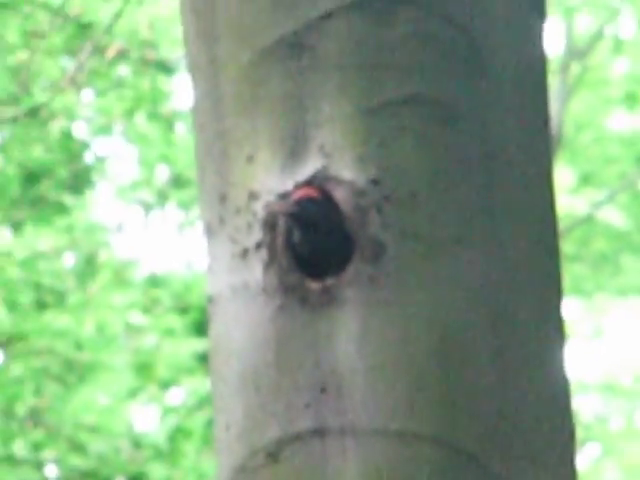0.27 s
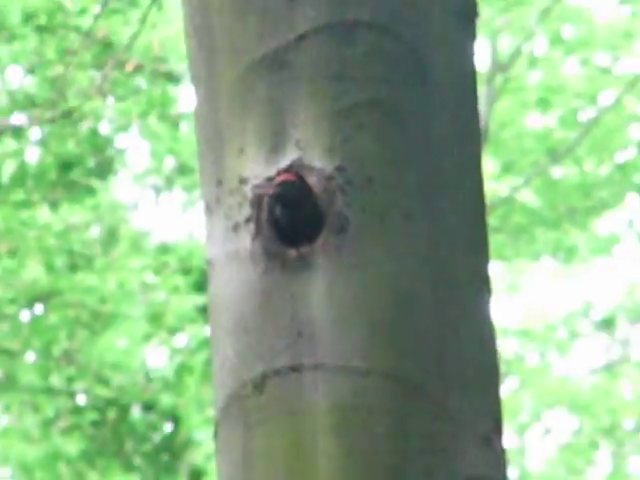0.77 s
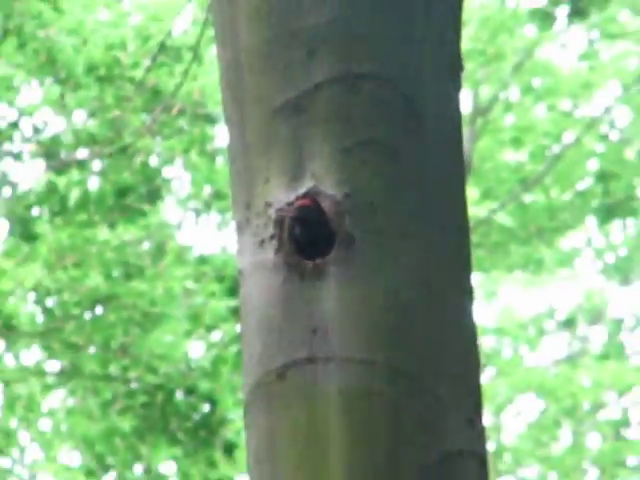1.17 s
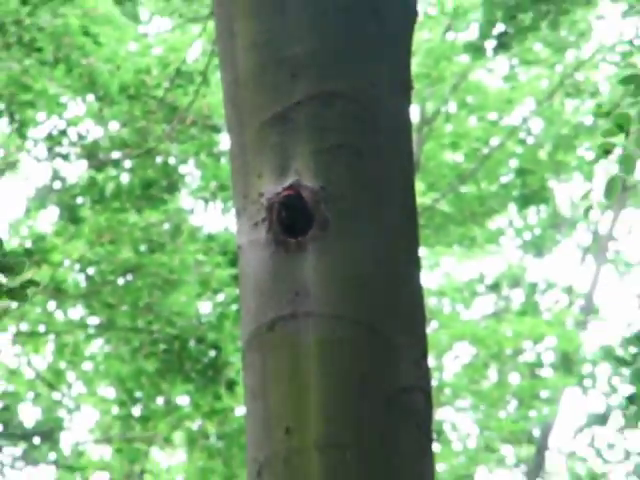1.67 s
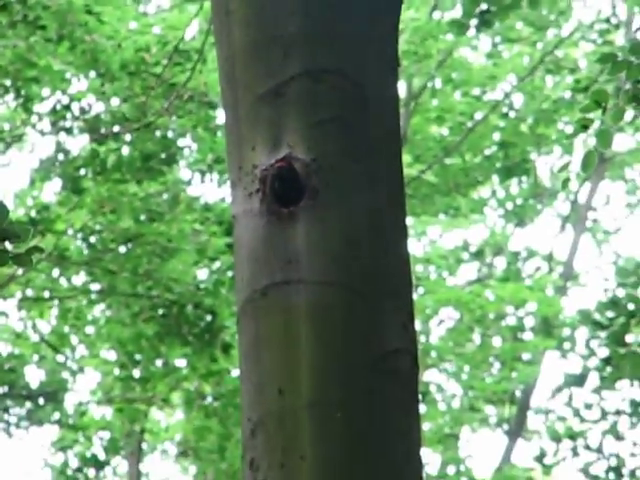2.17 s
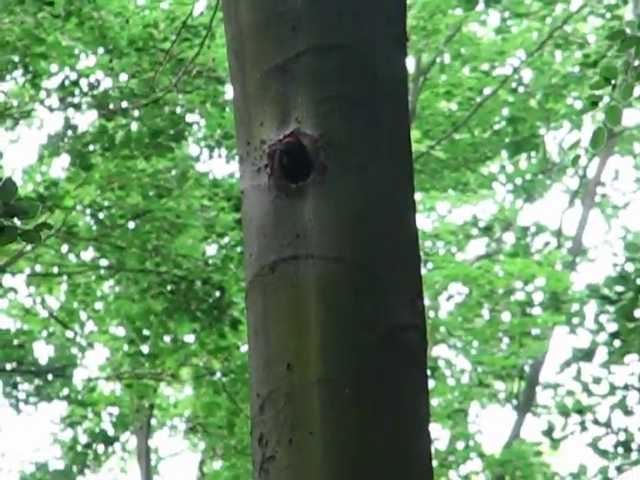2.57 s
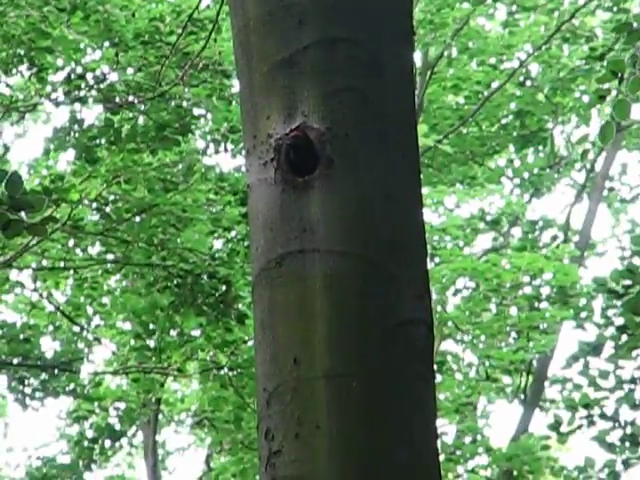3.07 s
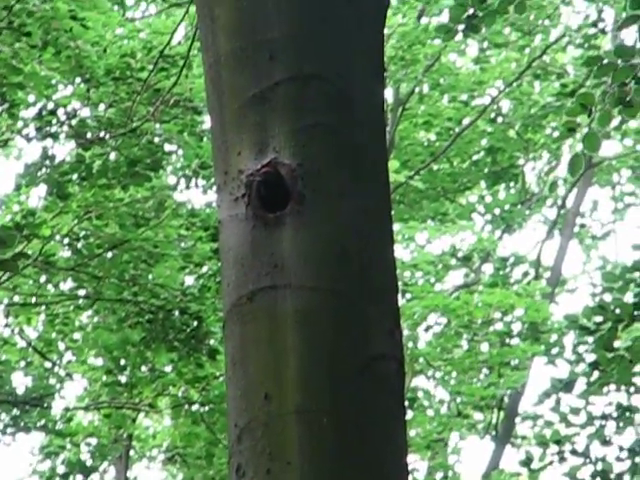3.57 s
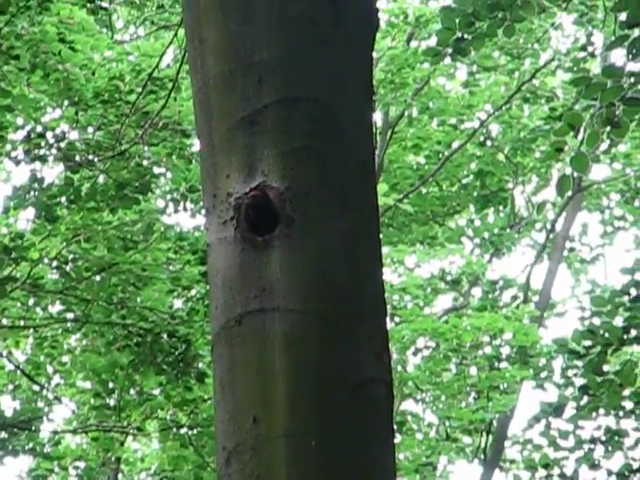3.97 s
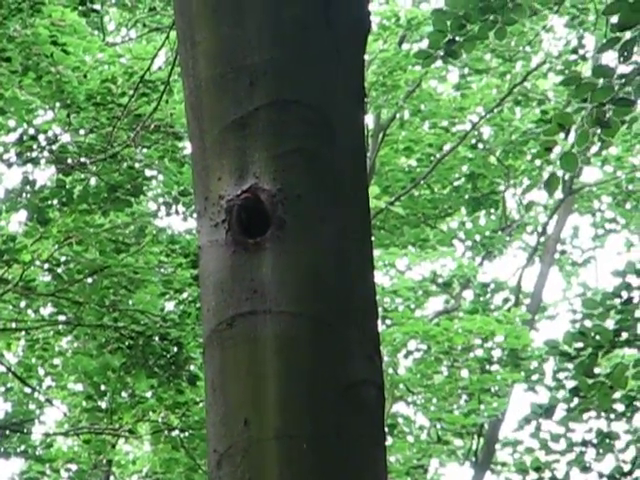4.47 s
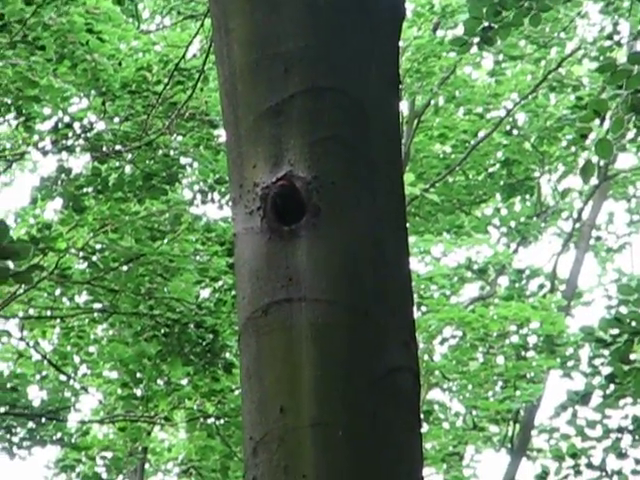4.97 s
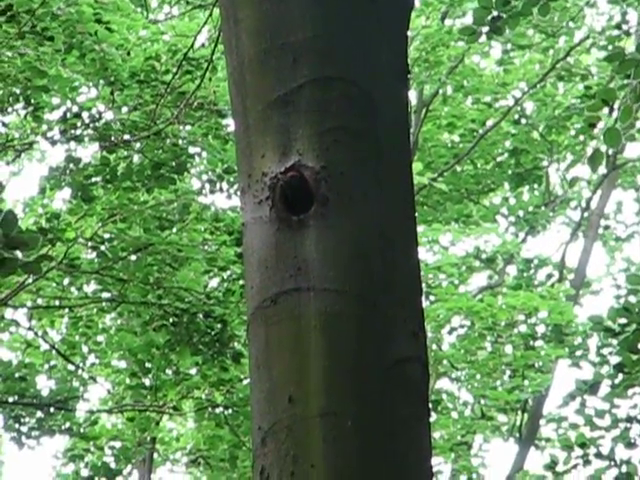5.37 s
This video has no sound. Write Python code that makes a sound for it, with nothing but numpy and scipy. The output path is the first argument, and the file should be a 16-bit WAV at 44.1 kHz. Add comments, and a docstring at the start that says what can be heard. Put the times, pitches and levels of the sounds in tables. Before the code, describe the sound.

Outdoor stereo in a quiet echoing wood: a young bird begs from its nest hole with short voiceless rasps, a long steady high squeal about a quarter of the way in, further rasps, and finally two rough double cries. Distant small birds whistle, trill and twitter faintly. Close by are an early dry click, a harder knock during the squeal, softer bumps and low uneven scuffing.

```python
"""Young woodpecker begging in the wood

High in a tree a nestling begs from its hole: breathy rasps of shaped noise, and one long thin squeal and
two harsh double cries from a pulsing membrane model. Scattered, decaying noise makes the wood's echoes.
Small birds whistle far off in gliding sines over a filtered-noise hush of leaves. One sharp dry click, a
single pulse, is heard early on; dull knocks of damped rings and a rustle of low, uneven noise are close by."""
import sys
import numpy as np
from scipy import signal
from scipy.fft import rfft, irfft
from scipy.io import wavfile
from scipy.ndimage import uniform_filter1d

SR = 44100
rng = np.random.default_rng(int(sys.argv[2]) if len(sys.argv) > 2 else 0)


def store_pcm(level_fs):
    """Save levels as 16-bit WAV."""
    pcm = np.round(np.clip(level_fs, -1, 1) * 32767).astype(np.int16)
    wavfile.write(sys.argv[1], SR, np.atleast_2d(pcm).T)


N = 247401
T = np.arange(N) / SR
FREQS = np.arange(N // 2 + 1) * SR / N

# Throat resonances of the squeal and its lead-in. Each row: frequency in Hz, gain in dB.
SQUEAL_COLOUR = [(1000, -50), (1550, -1.5), (2000, 4), (3100, 3.5), (4650, 1.5), (6200, -5.5), (7750, -1.5),
                 (9300, -9), (10900, -24.5), (14000, -55)]
# Throat resonances of the rasps, also the colour of the ticks. Each row: frequency in Hz, gain in dB.
RASP_COLOUR = [(900, -18.5), (1800, -13.5), (2600, -2), (3800, 0), (5000, -1.5), (6600, 6.5), (7800, 0),
               (9500, -12), (12500, -12.5), (15500, -28)]
# Colour of the air rushing in a voiced call. Each row: frequency in Hz, gain in dB.
AIR_COLOUR = [(600, -29.5), (1600, -13), (2300, -11), (3200, -0.5), (4400, -1.5), (5300, -5.5), (6600, 2),
              (8000, -11), (10000, -21), (13000, -21), (15500, -47)]
# The soft lead-in runs up to the squeal's start.
LEAD_IN_S, SQUEAL_START_S, SQUEAL_END_S = 1.394, 1.42, 2.09


def undb(db):
    """Decibels to gain."""
    return 10 ** (np.asarray(db) / 20)


def unit(x):
    """Scale to rms 1."""
    return x / np.sqrt(np.mean(x ** 2))


def at(points, hz):
    """Read (Hz, value) points on a log-frequency axis."""
    f, value = np.transpose(points)
    return np.interp(np.log(hz + 1), np.log(f), value)


def curve(rows):
    """The columns of (seconds, ..) rows, interpolated at every sample."""
    s, *columns = np.transpose(rows)
    return [np.interp(T, s, c) for c in columns]


def tint(x, colour):
    """Filter by (Hz, dB) points."""
    return irfft(rfft(x) * undb(at(colour, FREQS)), N)


def noise(colour):
    """Coloured noise of rms 1."""
    return unit(tint(rng.standard_normal(N), colour))


def walk(rate):
    """Smooth random motion of rms 1, about rate moves a second."""
    spectrum = rfft(rng.standard_normal(N)) * np.exp(-(FREQS / rate) ** 2)
    return unit(irfft(spectrum, N))


def envelope(start, length, attack_s, release_s):
    """Attack, hold and release; silent outside."""
    rise = (T - start) / attack_s
    fall = (start + length - T) / release_s
    return np.clip(np.minimum(rise, fall), 0, 1) ** 2


def pan(x, left_db):
    """Place a sound between left and right; left_db is left minus right."""
    return x * undb(np.array([[left_db], [-left_db]]) / 2)


def two_ears(x):
    """Sound from all around: two unrelated signals grow alike in the bass at closely spaced microphones."""
    # Left-right likeness of diffuse sound. Each row: frequency in Hz, correlation from 0 to 1.
    likeness_points = [(60, 1), (300, 0.65), (700, 0.53), (1500, 0.45), (3000, 0.14), (7000, 0.12)]
    freqs = np.fft.rfftfreq(x.shape[1], 1 / SR)
    likeness = np.clip(at(likeness_points, freqs), 0, 1)
    mid, side = irfft(rfft(x) * np.sqrt([1 + likeness, 1 - likeness]), x.shape[1])
    return unit(np.array([mid + side, mid - side]))


def wood(x, near_db, far_db, near_t60=0.46):
    """Echoes only: quick scatter from nearby trunks, and the long tail of the wood, shorter in the treble."""
    # Decay of the long tail. Each row: frequency in Hz, time to fall by 60 dB in seconds.
    tail_decay = [(400, 0.76), (1500, 1.4), (3200, 1.03), (6500, 1.14), (9000, 0.72), (14000, 0.48)]
    t = T[:int(1.5 * SR)]

    f, s, spray = signal.stft(rng.standard_normal((2, len(t))), SR, nperseg=256)
    t60 = np.maximum(at(tail_decay, f), .05)[:, None]
    tail = signal.istft(spray * np.exp(-np.log(1000) * s / t60), SR)[1][:, :len(t)]
    tail = tail * (1 - np.exp(-t / .028))  # the tail builds up gradually

    sparse = rng.standard_normal((2, len(t))) * (rng.random((2, len(t))) < .03)
    trunks = sparse * np.exp(-np.log(1000) * t / near_t60) * (t > .004)
    trunks = signal.sosfilt(signal.butter(2, 8000, fs=SR, output="sos"), trunks)

    response = undb(near_db) * two_ears(trunks) + undb(far_db) * two_ears(tail)
    response = response / np.sqrt(len(t))
    return signal.fftconvolve(x[None], response, axes=1)[:, :N]


def hush():
    """Leaves and distance as diffuse filtered noise, with a thin whine of narrow-band noise on top."""
    # Colour of the leaves and distance. Each row: frequency in Hz, gain in dB.
    hush_colour = [(15, -31), (25, -7.5), (82, 3), (164, -4.5), (378, -2.5), (648, -3.5), (722, 0),
                   (997, -5), (2010, -6.5), (3830, -2), (7500, -7), (8130, -10), (8810, -16), (11800, -16),
                   (15500, -22)]
    level_db, whine_db = -52, -62.0
    whine_hz, whine_width_hz = 8000, 90
    leaves = two_ears(np.array([noise(hush_colour), noise(hush_colour)]))
    air = leaves * undb(level_db + 0.56 * walk(16))
    resonance = 1 / (1 + ((FREQS - whine_hz) / whine_width_hz) ** 2)
    whine = irfft(rfft(rng.standard_normal((2, N))) * resonance, N)
    return air + undb(whine_db) * unit(whine)


def slur(s, length, start_hz, end_hz, db, buzz_hz=0, flutter_hz=95):
    """One whistled glide; a fast flutter of its pitch makes it buzz."""
    u = np.linspace(0, 1, int(max(length, .01) * SR))
    flutter = buzz_hz * np.sin(2 * np.pi * flutter_hz * T[:len(u)])
    hz = start_hz + (end_hz - start_hz) * u + flutter
    swell = np.sqrt(2 * np.sin(np.pi * u).clip(0))
    note = undb(db) * swell * np.sin(2 * np.pi * np.cumsum(hz) / SR)
    return np.pad(note, (max(int(s * SR), 0), N))[:N]


def song_notes():
    """Separate whistles, each sliding down by the same share of its pitch."""
    # Far songbirds' notes. Each row: start in seconds, length in seconds, middle pitch in Hz,
    # relative level in dB, buzz depth in Hz.
    note_rows = [(0.027, 0.1, 5510, -51, 280), (0.183, .16, 5450, -54, 190), (.38, 0.046, 4475, -48.5, 30),
                 (.44, 0.112, 4390, -52, 91), (0.544, 0.12, 3760, -45, 218), (.675, 0.095, 3790, -53, 200),
                 (0.802, 0.207, 3850, -54, 120), (1.519, 0.22, 4360, -46.5, 60),
                 (2.572, 0.11, 4410, -47, 60), (3.397, 0.19, 4355, -50.5, 50),
                 (3.922, 0.382, 3730, -59, 109), (4.567, .037, 3690, -48, 50), (1.25, .02, 3690, -47, 22),
                 (4.751, 0.026, 3990, -42, 250), (4.803, .11, 4356, -33.5, 78)]
    fall = 0.0233  # share of the pitch
    notes = 0
    for s, length, hz, db, buzz_hz in note_rows:
        notes = notes + slur(s, length, hz * (1 + fall / 2), hz * (1 - fall / 2), db, buzz_hz)
    return notes


def trill(count=15):
    """One bird's even run of quick down-slurs, strong and weak in turn."""
    start_s, step_s = 2.424, .0745
    strong_db, weak_db = -48.5, -54  # relative levels
    scatter = 0.029  # of each slur's pitch, as a share
    run = 0
    for i, tune in enumerate(1 + scatter * rng.standard_normal(count)):
        db = weak_db if i % 2 else strong_db
        run = run + slur(start_s + i * step_s, 0.0208, 3450 * tune, 2720 * tune, db)
    return run


def warble(count=260):
    """A far chorus of quick down-slurs at random pitches and slightly random times."""
    # Loudness of the chorus. Each row: time in seconds, relative level in dB.
    chorus_level = [(0, -105), (1.9, -52.5), (3.4, -45.5), (4.3, -55), (5.0, -46), (5.6, -49.5)]
    chorus = 0
    for i, (late, height, fall) in enumerate(rng.random((count, 3))):
        hz = 3000 + 2000 * height ** 1.085
        end_hz = hz * (.92 - 0.1585 * fall)
        chorus = chorus + slur((i + late) / count * T[-1], 0.01683, hz, end_hz, 0)
    return unit(chorus) * undb(curve(chorus_level)[0])


def songbirds():
    """Far whistles, a trill and a chorus heard mostly as echo."""
    notes, run, chorus = song_notes(), trill(), warble()
    direct = undb(-7.5) * notes + pan(undb(-2.5) * run, left_db=-14) + undb(-30) * chorus
    return direct + wood(notes + run + chorus, near_db=-8.5, far_db=-5.5)


def far_calls():
    """Low notes from deep in the wood: sines with random swings of level make them hoarse; echo blurs them."""
    # Faint low calls. Each row: start in seconds, nominal length in seconds, pitch in Hz, relative level in dB.
    call_rows = [(2.696, 0.031, 1080, -54), (3.38, 0.047, 958, -64.5), (3.511, 0.049, 1044, -63.5),
                 (4.214, 0.13, 1093, -67)]
    calls = 0
    for s, length, hz, db in call_rows:
        swell = np.exp(-(2 * (T - s) / length - 1) ** 4)
        calls = calls + undb(db) * swell * walk(160) * np.sin(2 * np.pi * hz * T)
    return calls + wood(calls, near_db=4.0, far_db=-5)


def rustle():
    """Uneven low scuffing close by: coloured noise in soft swells with a restless level."""
    # Colour of the scuffing. Each row: frequency in Hz, gain in dB.
    scuff_colour = [(30, -39), (110, -3.5), (200, -6), (310, 7.5), (500, 1.5), (800, -6), (1300, -16),
                    (2500, -22), (8000, -60)]
    # Swells. Each row: peak time in seconds, half length in seconds, relative level in dB.
    swell_rows = [(0.36, 0.49, -63), (1.48, 0.22, -53.5), (2.423, 0.28, -60), (3.68, 0.33, -54),
                  (4.476, 0.17, -65.5)]
    rest_db = -71.5  # relative level under the swells
    swell = undb(rest_db) + sum(undb(db) * np.exp(-((T - s) / half) ** 2) for s, half, db in swell_rows)
    scuff = noise(scuff_colour) * swell * undb(3.0 * walk(23) - 2.64)
    return pan(scuff, left_db=4.0) + wood(scuff, near_db=-11.0, far_db=-13.5)


def knocks(contact_s=0.00072):
    """Each knock rings damped modes, eased in by the soft contact; the harder ones start with a strong snap."""
    # Dull knocks. Each row: start in seconds, relative level in dB, base ring in Hz,
    # snap in dB relative to the knock's level.
    knock_rows = [(.971, -45, 554, -25), (1.126, -46.5, 653, -16), (1.603, -29.5, 830, 9),
                  (1.608, -32.5, 586, 5), (2.23, -44.5, 553, -12), (2.333, -43.5, 560.7, -16),
                  (3.553, -42.5, 310, -17), (3.8, -43.5, 320, -20), (4.428, -41.5, 340, 5.5),
                  (5.014, -42.5, 567, -14), (5.052, -46.5, 694, 7)]
    # Ringing modes. Each row: ratio to the base ring, relative level in dB, time to fall by 60 dB in seconds.
    mode_rows = [(1.009, 6, 0.034), (1.255, 2, 0.031), (1.87, -44, 0.01), (2, -2.5, 0.037)]
    t = T[:SR // 8]
    out = np.zeros(N)
    for s, db, hz, snap_db in knock_rows:
        ring = 0
        for ratio, mode_db, t60 in mode_rows:
            decay = np.exp(-np.log(1000) * t / t60)
            ring = ring + undb(mode_db) * np.sin(2 * np.pi * hz * ratio * t) * decay
        ring = 0.73 * ring * (1 - np.exp(-t / contact_s))
        snap = np.sin(2 * np.pi * (500 + 2.24 * hz) * t) * np.exp(-((t - .0008) / 0.00046) ** 2)
        knock = undb(db) * ring + undb(db + snap_db) * snap
        out += np.pad(knock, (int(s * SR), N))[:N]
    return pan(out, left_db=-6.5) + wood(out, near_db=-21, far_db=-52)


def click(db=-3.0):
    """One sharp dry click: a single pulse about a sample wide, without echo."""
    since = (T - .03624) * SR  # in samples
    return pan(-undb(db) * np.exp(-(since / 0.69) ** 2), left_db=-4.0)


def ticks(decay_s=0.0036):
    """Tiny bright snaps from the nest: noise that starts at once and dies in milliseconds."""
    # Faint ticks. Each row: start in seconds, relative level in dB.
    tick_rows = [(0.493, -46), (1.009, -45), (3.632, -42), (4.572, -42.5), (4.79, -38), (5.052, -37.5)]
    gain = sum(undb(db) * (T > s) * np.exp(-np.abs(T - s) / decay_s) for s, db in tick_rows)
    snaps = noise(RASP_COLOUR) * gain
    return snaps + wood(snaps, near_db=1, far_db=1)


def rasps():
    """Voiceless puffs through the open bill: noise that swells and drops, with a fine flutter."""
    # Begging rasps. Each row: peak time in seconds, relative level in dB, length relative to the usual.
    rasp_rows = [(.025, -53, 1.2), (.262, -56, 1.6), (.554, -51, 1.2), (0.797, -45, .75),
                 (1.095, -42.5, .9), (1.346, -37, 0.81), (1.99, -54, 1.5), (2.222, -50, 3),
                 (2.78, -48, 1.28), (3.023, -45.5, 1.06), (3.71, -44, 0.97), (3.989, -44, 1.25),
                 (4.375, -58, 1), (4.658, -45, 1.03)]
    rise_s, fall_s = .03, 0.019
    swell = 0
    for s, db, length in rasp_rows:
        reach = length * np.where(T < s, rise_s, fall_s)
        swell = swell + undb(db) / (1 + ((T - s) / reach) ** 2 / 2) ** 1.85
    call = swell * noise(RASP_COLOUR) * undb(0.66 * walk(230))
    return pan(call * undb(3.0), left_db=-3.5) + wood(call, near_db=-2.5, far_db=-5.5)


def from_nest(x):
    """Sound from the tree's direction leans a little right in the middle of its range."""
    # Lean between the microphones. Each row: frequency in Hz, left minus right in dB.
    balance = [(700, 4), (1500, -3), (2800, -4), (4400, -0.5), (8000, 0), (13000, 6)]
    left = tint(x[0], [(hz, db / 2) for hz, db in balance])
    right = tint(x[1], [(hz, -db / 2) for hz, db in balance])
    return np.array([left, right])


def syrinx(gain, hz, rough, bright_db, throat, air_colour, jitter, air):
    """A pulsing membrane heard through the throat; roughness shakes its pitch and adds hiss once a cycle."""
    rough, bright, _ = np.broadcast_arrays(rough, bright_db, T)
    hz = hz * (1 + jitter * rough * walk(893))
    phase = 2 * np.pi * np.cumsum(hz) / SR
    on = gain > 0
    k = np.arange(1, 11)[:, None]  # partial numbers
    below_limit = k * hz[on] < SR / 2
    partials = undb(at(throat, k * hz[on]) + bright[on] * np.log2(k)) * below_limit
    # level out the tone's power, so that gain alone sets the loudness
    power = uniform_filter1d(np.sum(partials ** 2, axis=0) / 2, size=200)
    tone = -np.sum(partials * np.cos(k * phase[on]), axis=0) / np.sqrt(power)
    hiss = tint(rng.standard_normal(N) * (1 + np.cos(phase)), air_colour)[on]
    share = np.clip(air * rough[on], 0, 1)
    out = np.zeros(N)
    out[on] = gain[on] * (np.sqrt(1 - share ** 2) * tone + share * unit(hiss))
    return out


def cry(start, length, top_hz, db, rasp, bright_db):
    """One shriek: it swells, its pitch arches over, and past the middle the voice clears for a moment."""
    # Throat resonances of a cry. Each row: frequency in Hz, gain in dB.
    cry_colour = [(700, -36), (1550, -19.5), (2200, -29), (3200, 3), (3800, 12), (4500, -4), (5300, -8),
                  (6400, 0), (7500, -0.5), (9200, -14.5), (15000, -42)]
    swell_db = 5  # rise over the whole length
    top_at, arch = .34, .45  # share of the length where the pitch tops; how strongly it bends down around it
    clear_at, clear_span, clear_rough = 0.68, 0.18, 0.25  # middle and half width as shares; roughness 0-1
    u = np.clip((T - start) / length, 0, 1)
    gain = envelope(start, length, attack_s=0.013, release_s=0.012) * undb(db + swell_db * (u - .5))
    hz = top_hz * (1 - arch * (u - top_at) ** 2)
    clear = np.exp(-((u - clear_at) / clear_span) ** 4)
    rough = rasp * (1 - clear) + clear_rough * clear
    return syrinx(gain, hz, rough, bright_db, cry_colour, AIR_COLOUR, jitter=.065, air=1.19)


def cries():
    """Short shrieks in two pairs, each starting as a rasp and clearing as its pitch falls."""
    # Harsh cries. Each row: start in seconds, length in seconds, top pitch in Hz, relative level in dB,
    # roughness at the start from 0 to 1, brightness in dB per octave.
    cry_rows = [(4.823, .053, 1532, -25.5, .75, -2), (4.895, 0.039, 1659, -22.5, 0.47, -5.5),
                (5.083, .057, 1646, -23.5, .6, -2), (5.162, 0.0362, 1701, -23, 0.52, -5.5)]
    call = sum(cry(*row) for row in cry_rows)
    return from_nest(call + wood(call, near_db=-5.5, far_db=-9.5))


def lead_in():
    """A soft rising note that fades just before the squeal breaks out."""
    start_hz, rise_hz_per_s = 1447, 14000
    start_db, fade_db_per_s = -31, 750  # start_db is a relative level
    length = SQUEAL_START_S - LEAD_IN_S
    age = np.clip(T - LEAD_IN_S, 0, length)
    gain = envelope(LEAD_IN_S, length, attack_s=0.0036, release_s=.001)
    gain = gain * undb(start_db - fade_db_per_s * age)
    return syrinx(gain, start_hz + rise_hz_per_s * age, rough=0.14, bright_db=-8, throat=SQUEAL_COLOUR,
                  air_colour=AIR_COLOUR, jitter=0.041, air=.63)


def second_voice(both, age):
    """The syrinx's second side, sounding briefly at the squeal's start with a sagging pitch."""
    # Throat resonances of the second voice. Each row: frequency in Hz, gain in dB.
    second_colour = [(1900, -30), (3800, -1), (5700, -2.5), (7600, 7.5), (9500, -7), (11400, -11),
                     (14000, -43)]
    start_hz, sag_hz_per_s, level_db = 1923, 1100, -30  # level_db is relative
    return syrinx(both * undb(level_db), start_hz - sag_hz_per_s * age, rough=0.361, bright_db=-2.5,
                  throat=second_colour, air_colour=AIR_COLOUR, jitter=0.074, air=1.0)


def squeal(yields_db=-5, leap_dull_db=-8, drop_dull_db=-20):
    """The long call leaps high, settles on one note, sags and drops; it is duller off its note."""
    # Loudness of the first voice. Each row: time in seconds, relative level in dB.
    effort = [(1.424, -30), (1.48, -34.5), (1.54, -37.5), (1.635, -40), (1.685, -33), (1.77, -37),
              (1.865, -39), (1.96, -34), (2.06, -33.5)]
    note_hz, waver = 1555, 0.00353  # the held note; its wavering as a share of the pitch
    leap_hz, settle_s = 446, .016  # above the note at the start
    sag_hz, sag_s, drop_hz, drop_s = 79.1, .06, 543, .012  # below it at the end: slowly, then fast
    # roughness weights at both ends, how soon it clears, and the roughness between
    hoarse_start, hoarse_end, hoarse_s, clear_rough = 0.29, .45, 0.049, 0.038
    bright_db, opening_db_per_s = -4, 9.5  # brightness per octave before dulling, and its growth

    age, left = np.maximum(T - SQUEAL_START_S, 0), np.maximum(SQUEAL_END_S - T, 0)
    leap, sag, drop = np.exp(-age / settle_s), np.exp(-left / sag_s), np.exp(-left / drop_s)
    hz = note_hz * (1 + waver * walk(9)) + leap_hz * leap - sag_hz * sag - drop_hz * drop
    rough = clear_rough + hoarse_start * (1 - leap) * np.exp(-(age / hoarse_s / 2) ** 2)
    rough = rough + hoarse_end * np.exp(-left / hoarse_s)
    bright = bright_db + opening_db_per_s * age + leap_dull_db * leap + drop_dull_db * np.sqrt(drop)

    # the first voice yields while the second sounds
    both = envelope(SQUEAL_START_S, 0.086, attack_s=0.013, release_s=0.023)
    gain = envelope(SQUEAL_START_S, SQUEAL_END_S - SQUEAL_START_S, attack_s=0.00074, release_s=0.016)
    gain = gain * undb(curve(effort)[0] + 1.0 + yields_db * both)
    first = syrinx(gain, hz, rough, bright, SQUEAL_COLOUR, AIR_COLOUR, jitter=.055, air=0.87)
    call = lead_in() + first + second_voice(both, age)
    return from_nest(call * undb(-4.0) + wood(call, near_db=-8, far_db=-6.0))


def scene():
    """The wood, the rustle and knocks close by, one dry click, and the nestling."""
    background = hush() + songbirds() + far_calls()
    close_by = rustle() + knocks()
    nestling = ticks() + rasps() + cries() + squeal()
    return background + close_by + click() + nestling


def record(dry):
    """The recorder cuts the top with a steep low-pass."""
    top_hz = 15800
    return signal.sosfilt(signal.ellip(10, .2, 70, top_hz, fs=SR, output="sos"), dry)


dry = scene()
out = record(dry)
store_pcm(out)
```